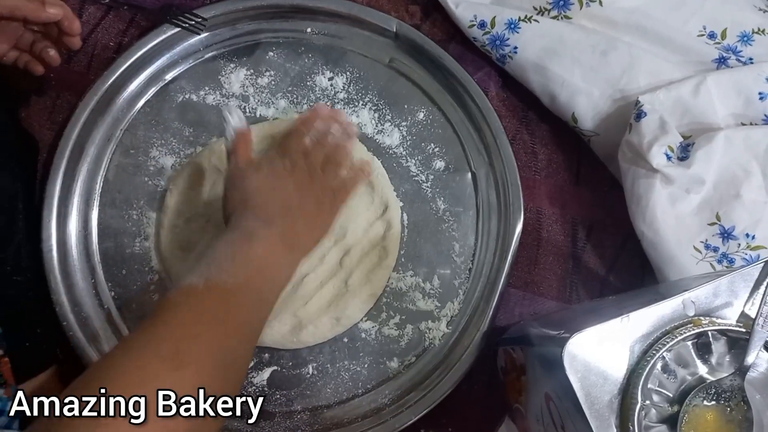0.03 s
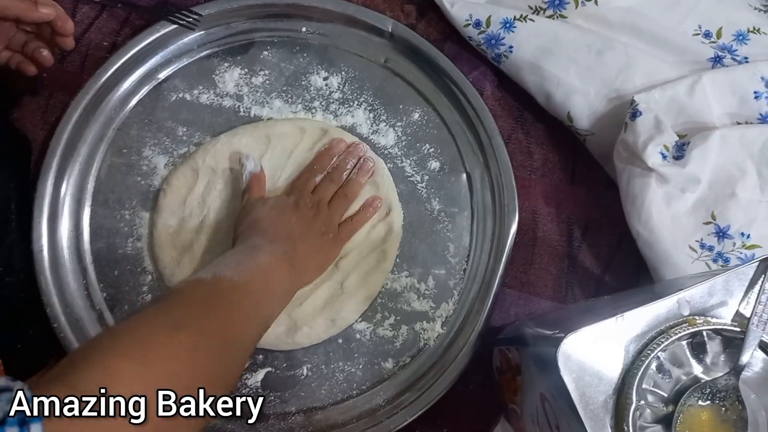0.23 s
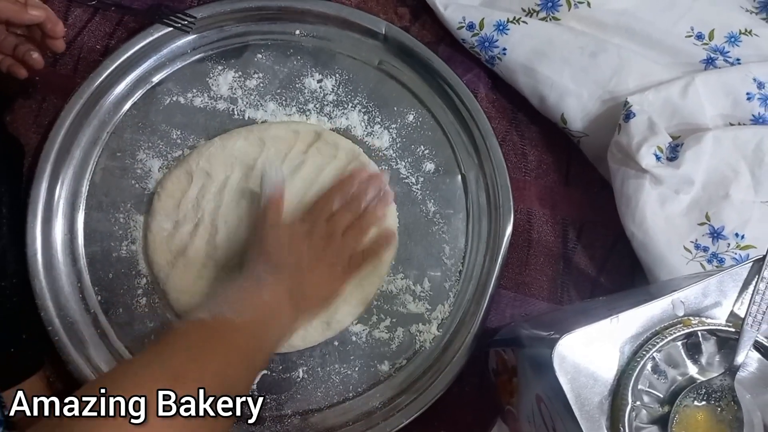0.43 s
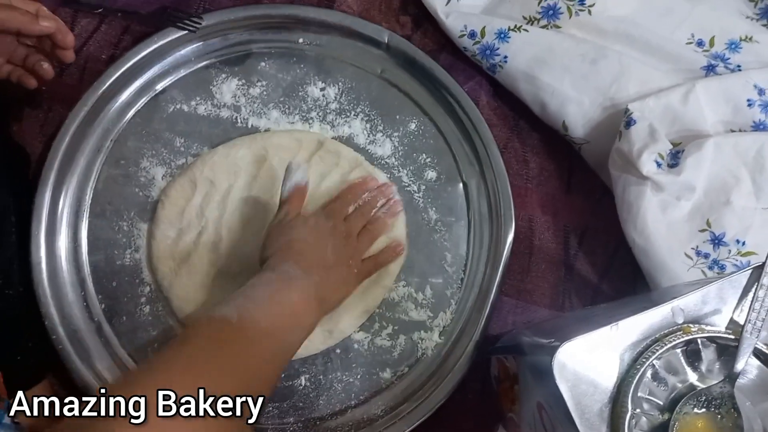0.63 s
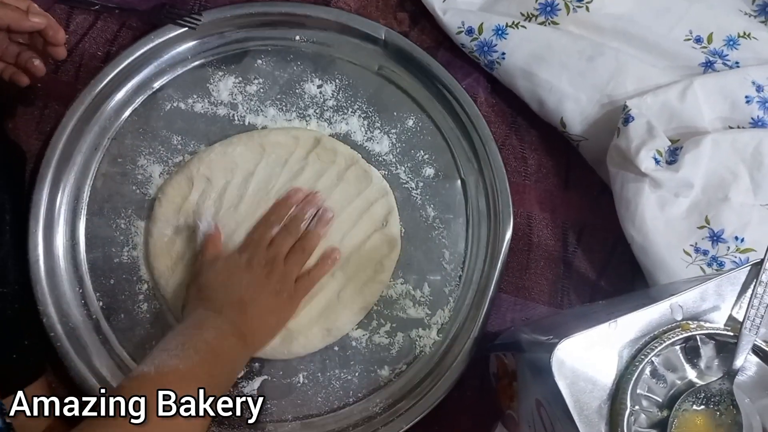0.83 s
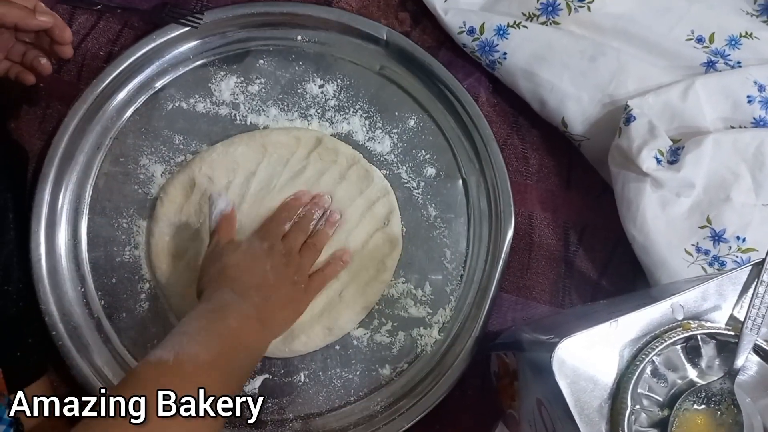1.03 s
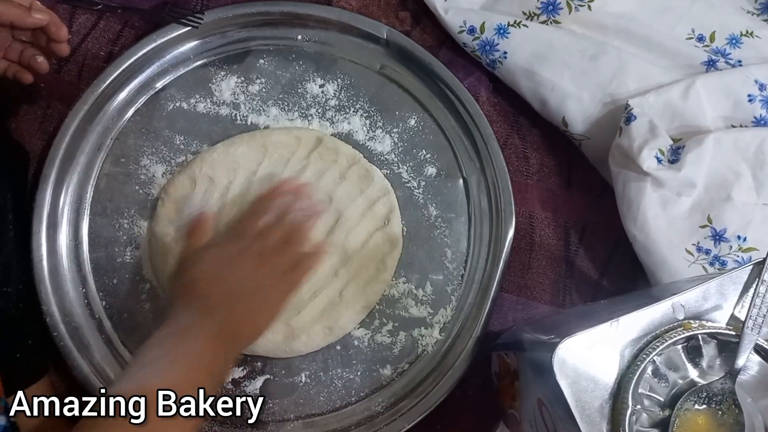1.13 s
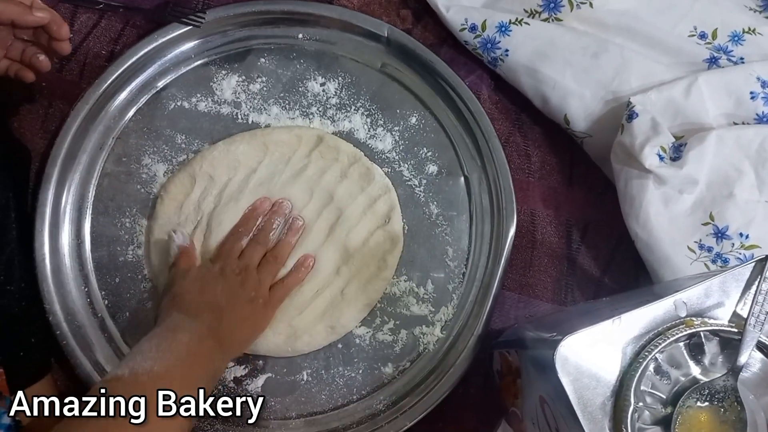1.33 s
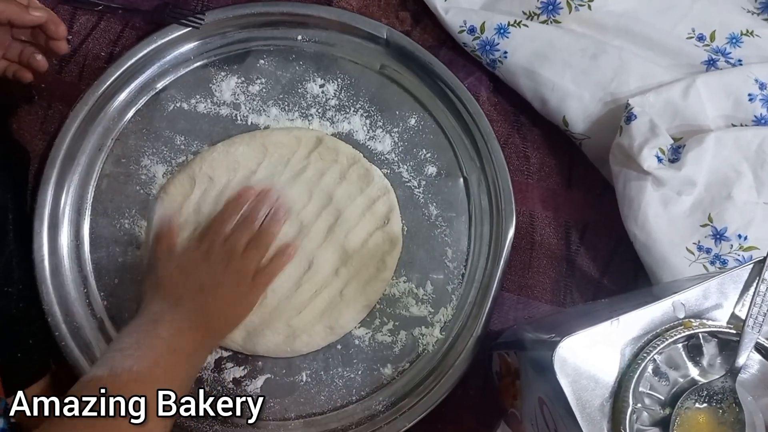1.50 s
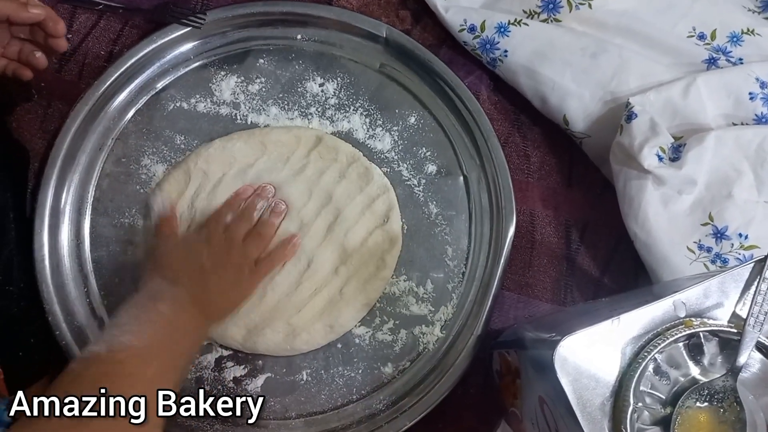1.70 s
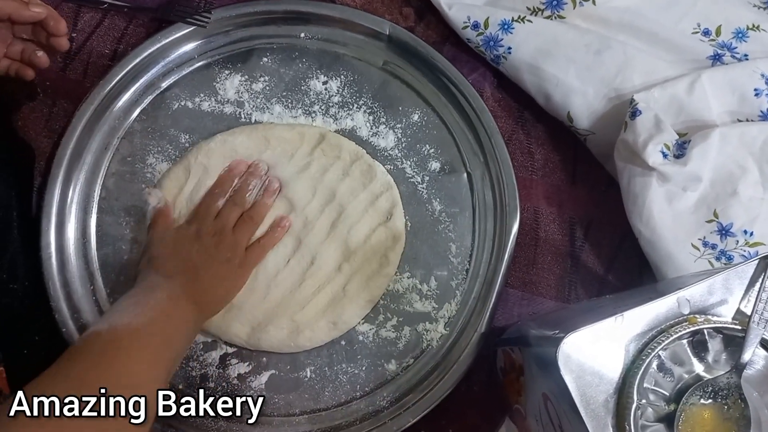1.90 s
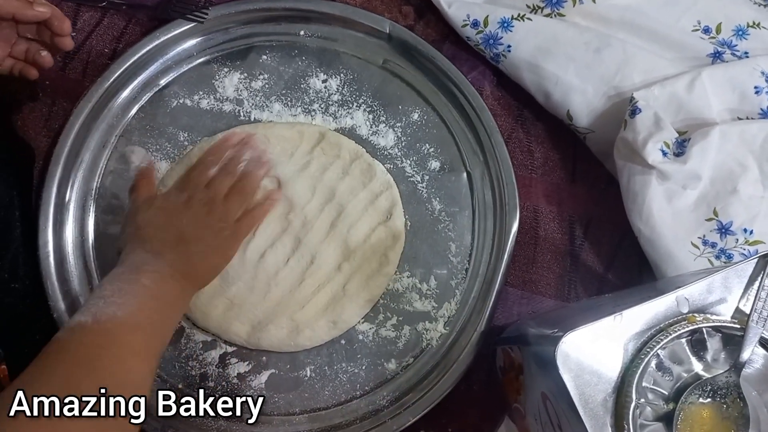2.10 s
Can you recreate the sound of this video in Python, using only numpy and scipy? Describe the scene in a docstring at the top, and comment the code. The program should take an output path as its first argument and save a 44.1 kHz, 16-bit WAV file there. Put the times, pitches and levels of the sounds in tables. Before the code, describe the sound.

A hand pats soft dough on a floured steel tray about three times a second, close to the microphone. The first three pats make the tray skid with a short ringing rasp; plain thuds follow. A kitchen appliance hums faintly.

```python
"""A hand pats soft dough on a floured steel tray about three times a second, close to a stereo pair.
Each pat is a dull thud with a light smack of skin; in between, the palm brushes through flour and
skin ticks as it sticks. The first three pushes make the tray skid with a short metallic rasp and ring.
The place is a small kitchen with nearby surfaces, where an appliance hums in the background."""
import sys
import numpy as np
from scipy import signal
from scipy.fft import rfft, irfft
from scipy.io import wavfile
from scipy.ndimage import uniform_filter1d

SR = 44100
rng = np.random.default_rng(int(sys.argv[2]) if len(sys.argv) > 2 else 0)


def wav_out(sig):
    """Save sig, one row per channel (or a flat mono array), as 16-bit PCM at SR to the path in sys.argv[1]."""
    wavfile.write(sys.argv[1], SR, np.round(np.clip(np.atleast_2d(sig).T, -1, 1) * 32767).astype(np.int16))


N = 94815
T = np.arange(16384) / SR  # time axis of one event, s
HZ = np.fft.rfftfreq(len(T), 1 / SR)


def amp(db):
    return 10 ** (np.asarray(db) / 20)


def unit_rms(x):
    return x / np.sqrt(np.mean(x ** 2) + 1e-20)


def curve_at(points, hz):
    """A curve's value at hz, on a log-frequency axis."""
    f, value = np.transpose(points)
    return np.interp(np.log(hz + 1), np.log(f + 1), value)


def add(mix, start_s, sound):
    part = mix[:, max(round(start_s * SR), 0):][:, :sound.shape[-1]]
    part += sound[..., :part.shape[1]]


def bell(centre_hz, octaves):
    return np.exp(-(np.log2((HZ + 1) / centre_hz) / octaves) ** 2)


def noise():
    return rng.standard_normal((2, len(T)))


def grains(per_s, spread_db):
    """A dense run of tiny clicks of uneven size."""
    size = amp(spread_db * np.minimum(rng.exponential(1, (2, len(T))), 4))
    return unit_rms(noise() * size * (rng.random((2, len(T))) < per_s / SR))


# Stereo image of a source near the microphones: f/Hz, left-right correlation
CLOSE_IMAGE = [(100, -0.91), (600, 0.79), (1400, -0.8), (2800, 0.13), (4500, -0.39), (7000, 0.74),
               (15000, 0.86)]


def close_miked(pair, spectrum_db):
    """Gives two unrelated signals a spectrum and the stereo image of a close source."""
    likeness = np.clip(curve_at(CLOSE_IMAGE, HZ), -1, 1)
    mid, side = rfft(pair) * np.sqrt([(1 + likeness) / 2, (1 - likeness) / 2])
    cepstrum = irfft(np.log(unit_rms(amp(spectrum_db))))
    cepstrum *= 1 + np.sign(len(T) / 2 - np.arange(len(T)))  # minimum phase keeps attacks sharp
    cepstrum[0] /= 2
    return irfft(np.array([mid + side, mid - side]) * np.exp(rfft(cepstrum)))


# Kitchen air all around the microphones: f/Hz, relative level/dB
AIR_SPECTRUM = [(20, -32), (48, -29), (70, -1.5), (110, -5.5), (150, -0.5), (200, -8), (300, -9.5),
                (390, -15), (500, -14.5), (800, -24), (1300, -27), (2200, -23), (4300, -32.5),
                (6000, -39.5), (7800, -37.5), (10000, -44.5), (16000, -44)]
# Its stereo image: f/Hz, left-right correlation
AIR_IMAGE = [(60, 0.96), (130, 1), (290, 0.89), (640, 0.36), (1410, -0.069), (3100, -0.31), (6820, 0.49),
             (15000, 1)]
# Its balance: f/Hz, left minus right/dB
AIR_PAN = [(60, 4), (250, -1), (640, -0.5), (1410, -9.5), (3100, -1), (7000, 0)]


def room_tone(level_db=-51, patch_db=2.5):
    """Soft room noise, slightly patchy in time and frequency."""
    frames, hz = N // 256 + 5, np.fft.rfftfreq(2048, 1 / SR)
    draws = rng.standard_normal((frames, len(hz), 5)).T
    left, unrelated = draws[0] + 1j * draws[1], draws[2] + 1j * draws[3]
    likeness = np.clip(curve_at(AIR_IMAGE, hz), -1, 1)[:, None]
    right = likeness * left + np.sqrt(1 - likeness ** 2) * unrelated
    patches = uniform_filter1d(draws[4], size=24, axis=0)
    patches = unit_rms(uniform_filter1d(patches, size=14, axis=1))
    pan_db = np.multiply.outer([.5, -.5], curve_at(AIR_PAN, hz))[..., None]
    gain = amp(curve_at(AIR_SPECTRUM, hz)[:, None] + pan_db + patch_db * patches)
    air = signal.istft(np.array([left, right]) * gain, nperseg=2048, noverlap=1792)[1][:, :N]
    return amp(level_db) * unit_rms(air)


# Appliance in the background, equal at both microphones: f/Hz, level/dB
HUM_TONES = [(81, -60.5), (146.8, -52)]


def appliance_hum(waver_depth=0.26, waver_hz=5):
    """An appliance hums on two low, wavering tones."""
    t, hum = np.arange(N) / SR, 0
    rolloff = 1 + (np.fft.fftfreq(N, 1 / SR) / waver_hz) ** 4
    for hz, db in HUM_TONES:
        drift = np.fft.ifft((rng.standard_normal(N) + 1j * rng.standard_normal(N)) / rolloff)
        drift /= np.sqrt(np.mean(abs(drift) ** 2))
        tone = (1 + waver_depth * drift) * np.exp(2j * np.pi * hz * t)
        hum += amp(db) * np.sqrt(2) * tone.real
    return hum


# Reverberation of the small kitchen: f/Hz, t60/s
KITCHEN_DECAY = [(150, 0.4), (600, 0.37), (2200, 0.34), (5000, 0.26), (8000, 0.21), (15000, 0.12)]


def kitchen_echo(sound, early_db=-5.5, early_t60_s=0.19, tail_db=-11.5):
    """Quick reflections from nearby surfaces, then a short diffuse tail."""
    hz, t, spectra = signal.stft(noise(), SR, nperseg=256)
    decay = amp(-60 * t / curve_at(KITCHEN_DECAY, hz)[:, None])
    tail = signal.istft(spectra * decay, SR)[1][:, :len(T)] * np.minimum(T / 0.011, 1)
    early = noise() * amp(-60 * T / early_t60_s) * np.minimum(T / 0.001, 1)
    early = close_miked(early, np.zeros(len(HZ)))
    echo = amp(tail_db) * tail / np.linalg.norm(tail[0])
    echo += amp(early_db) * early / np.linalg.norm(early[0])
    return signal.fftconvolve(sound, echo, axes=1)[:, :N]


# Sticky ticks, close up: t/s, level/dB, centre f/Hz, width/octaves
STICKY_TICKS = [(0.48, -59.5, 8100, 0.49), (1.2318, -40.5, 6030, 0.7), (1.292, -47, 8000, 0.42),
                (1.421, -61, 7600, 0.7), (1.488, -58.5, 7800, 0.92), (1.561, -46, 8900, 0.46),
                (1.5683, -34, 1910, 1.27), (1.8646, -46.5, 1170, 1.5)]


def skin_ticks(decay_s=0.0023):
    """Skin catches on the dough and lets go."""
    out = np.zeros((2, N))
    for start, db, hz, octaves in STICKY_TICKS:
        burst = noise() * np.exp(-T / decay_s)
        add(out, start, amp(db) * close_miked(burst, 18 * bell(hz, octaves)))
    return out


# Palm strokes, close up: peak t/s, rise/s, fall/s, level/dB, body around 1.5 kHz/dB
PALM_STROKES = [(0.176, 0.013, 0.016, -53, 10), (.497, 0.011, 0.017, -57, 3), (.522, .006, .011, -42.5, 5),
                (0.719, .03, .025, -62, -10), (0.894, .015, 0.0091, -54, 6),
                (1.118, 0.016, 0.011, -56, -30), (1.26, 0.017, 0.055, -59, -8),
                (1.585, 0.014, 0.025, -50, 7), (1.796, .015, 0.011, -57.5, 0),
                (1.897, 0.019, 0.036, -53, 4.5), (2.097, 0.016, 0.0076, -54, -1.5)]
# Hiss of the flour: f/Hz, relative level/dB
FLOUR_SPECTRUM = [(300, 19), (1000, 3.5), (2300, 6.5), (5000, -0.5), (7700, 0.5), (10000, -4), (13000, 3),
                  (16000, -11.5)]


def flour_brushes():
    """Fine flour grains hiss under the sliding palm; pressing harder gives them more body."""
    out = np.zeros((2, N))
    for peak_s, rise, fall, db, body_db in PALM_STROKES:
        t = T - 3 * rise  # zero at the stroke's peak
        stroke = np.exp(-(t / np.where(t < 0, rise, fall)) ** 2 / 2)
        hiss = stroke * grains(per_s=9000, spread_db=1.6)
        spectrum_db = curve_at(FLOUR_SPECTRUM, HZ) + body_db * bell(1480, 1.34)
        add(out, peak_s + t[0], amp(db) * close_miked(hiss, spectrum_db))
    return out


# Modes of the loaded steel tray: f/Hz, relative level/dB, t60/s, left minus right/dB
TRAY_MODES = [(390, -13, .1, 7), (497, -3, .09, 3), (524, -1.5, .09, 5), (707, -9, .1, 0),
              (945, -9, .08, 1), (1026, 1, .11, 4), (1062, -3, .08, 1), (1173, 0, .12, 11),
              (1309, -2, .12, 10), (1455, -5, .07, 0), (1660, -6, .04, 2), (1996, -1, .1, -3),
              (2123, -4, .1, 5), (2318, 1, .09, 0), (2570, -8, .04, 4), (3170, -7, .04, 3),
              (7800, -12, .025, 0), (12637, -6, .06, 0), (14253, -11, .06, 0)]
SLIPS_PER_S, SLIP_SPREAD_DB = 6000, 1.5


def tray_ring(force, tilt_db, left_lead_s=.00019):
    """Rubbing drives every mode of the tray; the sound reaches the left microphone first."""
    out = np.zeros((2, len(T)))
    lag = np.exp(-2j * np.pi * HZ * left_lead_s * np.array([[0], [1]]))
    bass_loss = signal.butter(4, 380, "high", fs=SR, output="sos")  # the tray radiates little bass
    drive = signal.sosfilt(bass_loss, force * grains(SLIPS_PER_S, SLIP_SPREAD_DB)[0])
    for hz, db, t60, pan_db in TRAY_MODES:
        mode = amp(-60 * T / t60) * np.cos(2 * np.pi * hz * T)
        level_db = db + tilt_db * np.log2(hz) + pan_db * np.array([[.5], [-.5]])
        out += amp(level_db) * unit_rms(irfft(rfft(drive) * rfft(mode) * lag))
    return unit_rms(out) * np.sqrt(np.mean(force ** 2))


# Tray skids, close up: t/s, length/s, ring level/dB, rasp level/dB, growth over the skid/dB,
# bite around 4.4 kHz/dB, ring tilt/(dB per octave)
TRAY_SKIDS = [(0.21, 0.004, -24.5, -27.5, 2.5, 10.5, -2), (0.217, 0.025, -24, -22, -9.5, 3, -2.1),
              (0.248, 0.026, -29, -28.5, -9.5, 6.5, -1.5), (0.5589, 0.0097, -25, -34.5, -4, 15, 3.5),
              (0.566, 0.0274, -28, -31, -2, 0, -3), (0.5816, 0.029, -29, -30.5, -2.5, 0.5, -7),
              (0.9203, 0.017, -33.5, -33, -10, -4.5, -7.5)]
# Rasp of the sliding steel: f/Hz, relative level/dB
RASP_SPECTRUM = [(120, -55), (290, -27), (440, -3.5), (800, 3), (1400, 2), (2300, 10), (3000, -1.5),
                 (4200, -4), (6200, -6.5), (7500, 6.5), (8700, -2), (10400, -4.5), (11800, 0.5),
                 (12600, 3.5), (13100, 3.5), (15600, -5)]


def tray_skids(attack_s=.0012, release_s=0.0041, shudder_db=-15.5):
    """The tray sticks and slips: tiny catches rasp, ring the metal and shake the dough."""
    ring, rasp = np.zeros((2, 2, N))
    for start, length, ring_db, rasp_db, growth_db, bite_db, tilt_db in TRAY_SKIDS:
        force = np.minimum(T / attack_s, 1) * amp(growth_db * np.minimum(T / length, 1))
        force *= np.exp(-np.maximum(T - length, 0) / release_s)
        catches = force * grains(SLIPS_PER_S, SLIP_SPREAD_DB)
        spectrum_db = curve_at(RASP_SPECTRUM, HZ) + bite_db * bell(4400, 0.62)
        add(rasp, start, amp(rasp_db) * close_miked(catches, spectrum_db))
        add(ring, start, amp(ring_db) * tray_ring(force, tilt_db))
        shudder = close_miked(force * noise(), 50 * bell(187.5, 0.54))
        add(ring, start, amp(ring_db + shudder_db) * shudder)
    return ring, rasp


def rim_tone(hz=894, level_db=-52.5, t60_s=1.4):
    """The tray's free rim sings on as one faint, fading tone."""
    t = np.arange(N) / SR
    return amp(level_db - 60 * t / t60_s) * np.sin(2 * np.pi * hz * t)


# Palm landing on dough, close and central: t/s, thud level/dB, settled thud f/Hz,
# smack level/dB, tray ring level/dB
PALM_PATS = [(.1450, -38, 190, -43.5, -48.5), (.510, -38.5, 210, -65, -47), (0.87, -30, 209, -37, -45.5),
             (1.2305, -25.5, 149, -43, -48.5), (1.5629, -31, 173, -40, -52),
             (1.8658, -41.5, 183, -46, -52.5)]
# Smack of skin: f/Hz, relative level/dB
SMACK_SPECTRUM = [(200, 5), (500, 18.5), (1000, -4), (2200, 6), (4000, 1.5), (7500, -6), (10500, -9.5),
                  (16000, -25)]


def dough_pats(thud_peak_s=0.0044, sag=0.82, sag_s=0.002, smack_s=.005, press_s=0.0084):
    """The dough takes the blow in a few sagging cycles; the skin smacks and the tray rings faintly."""
    out = np.zeros((2, N))
    swell = (T / thud_peak_s * np.exp(1 - T / thud_peak_s)) ** 2
    touch = np.minimum(T / 0.0005, 1) * np.exp(-T / smack_s)
    press = np.exp(-T / press_s)  # the palm keeps loading the tray for a moment
    for start, thud_db, hz, smack_db, ring_db in PALM_PATS:
        cycles = np.cumsum(hz * (1 + sag * np.exp(-T / sag_s))) / SR
        add(out, start, amp(thud_db) * swell * np.sin(2 * np.pi * cycles))
        smack = close_miked(noise() * touch / touch.max(), curve_at(SMACK_SPECTRUM, HZ))
        add(out, start, amp(smack_db) * smack)
        add(out, start, amp(ring_db) * tray_ring(press, tilt_db=0))
    return out


def scene():
    """Hand and tray close to the microphones, with the kitchen behind them."""
    hand = dough_pats() + flour_brushes() + skin_ticks()
    ring, rasp = tray_skids()
    add(ring, TRAY_SKIDS[1][0], rim_tone())  # set off by the hardest skid
    echo = kitchen_echo(rasp + amp(-7) * ring + amp(-5) * hand)
    return hand + ring + rasp + echo + room_tone() + appliance_hum()


def record(dry):
    """The recorder's 58 Hz bass cut and 16.1 kHz band limit."""
    bass_cut = signal.butter(3, 58, "high", fs=SR, output="sos")
    band_limit = signal.firwin(255, 16100, window=("kaiser", 8), fs=SR)
    return signal.oaconvolve(signal.sosfilt(bass_cut, dry), band_limit[None], "same")


dry = scene()
out = record(dry)
wav_out(out)
```